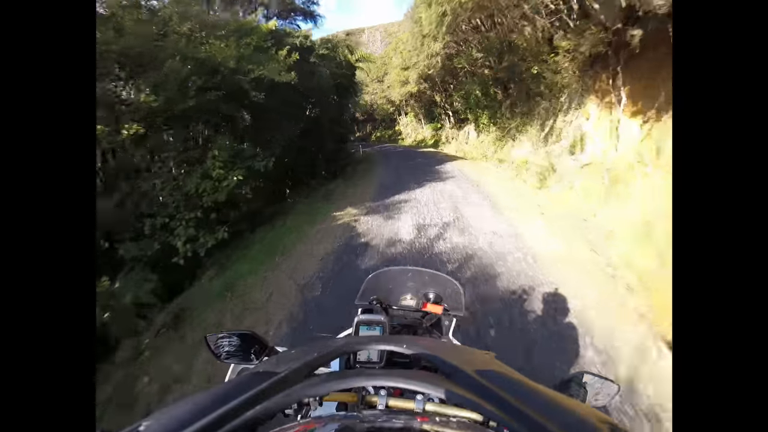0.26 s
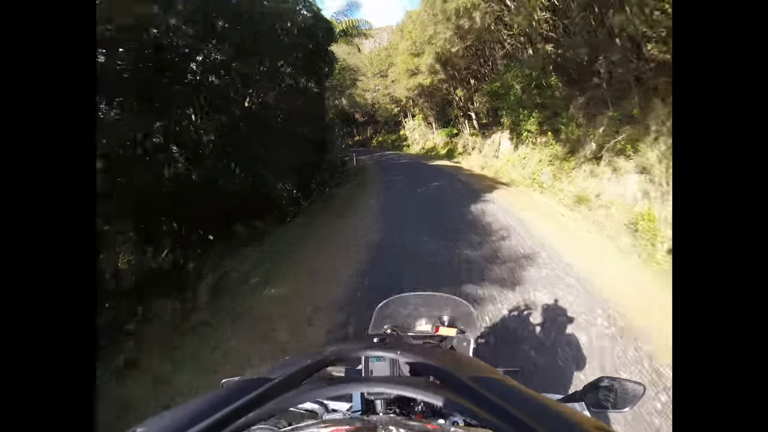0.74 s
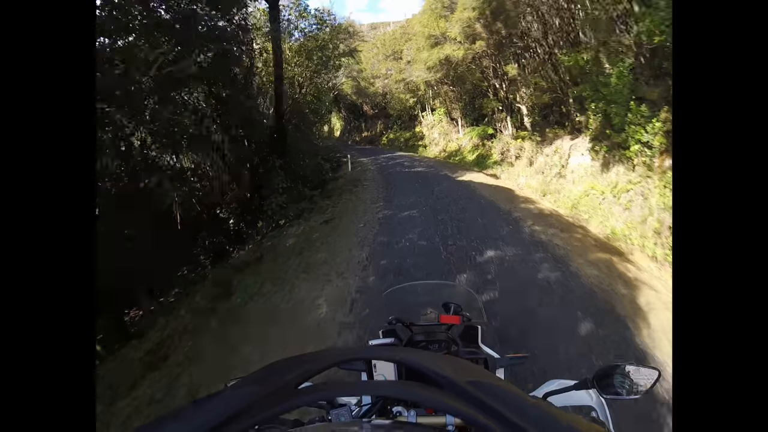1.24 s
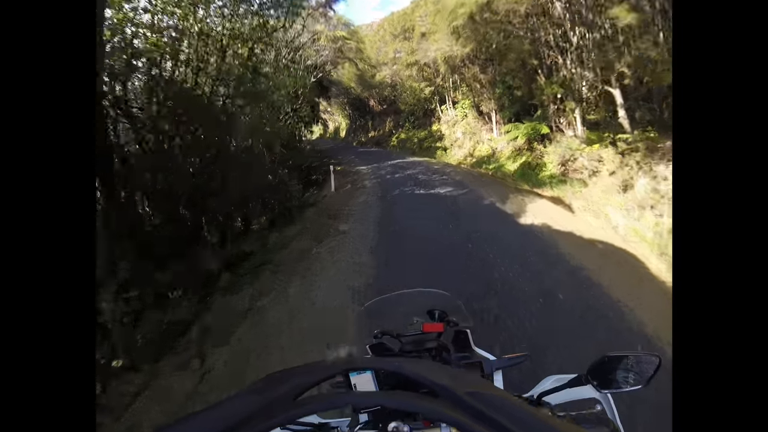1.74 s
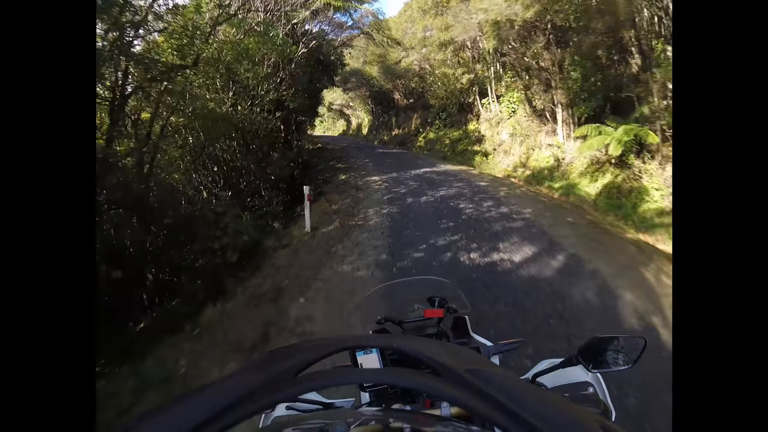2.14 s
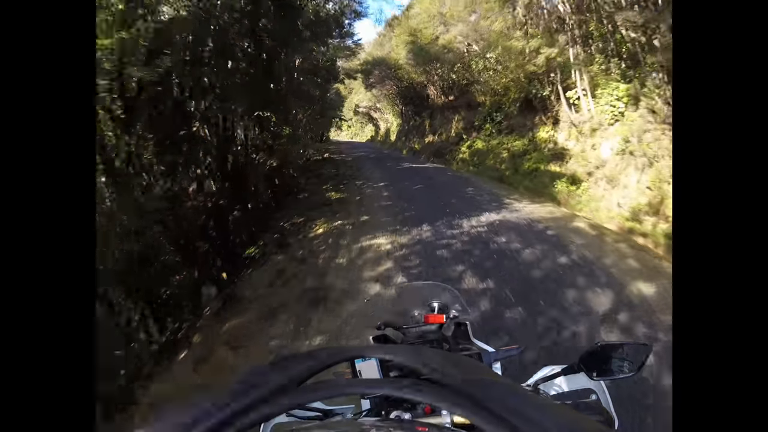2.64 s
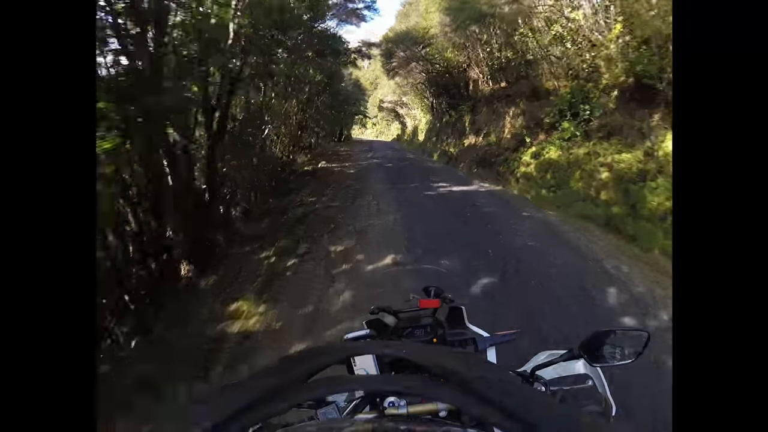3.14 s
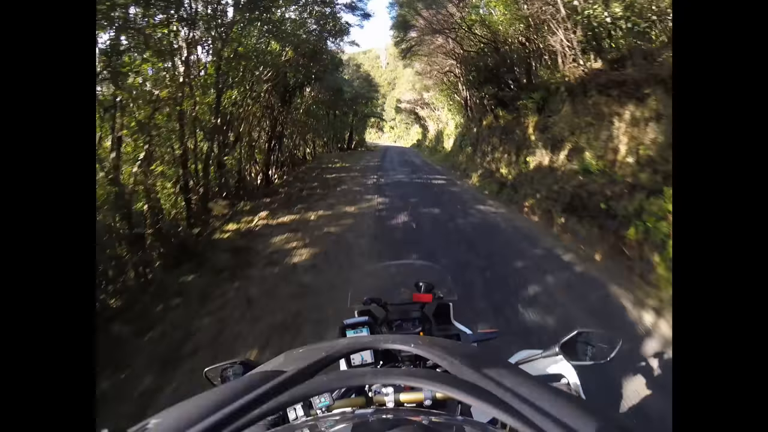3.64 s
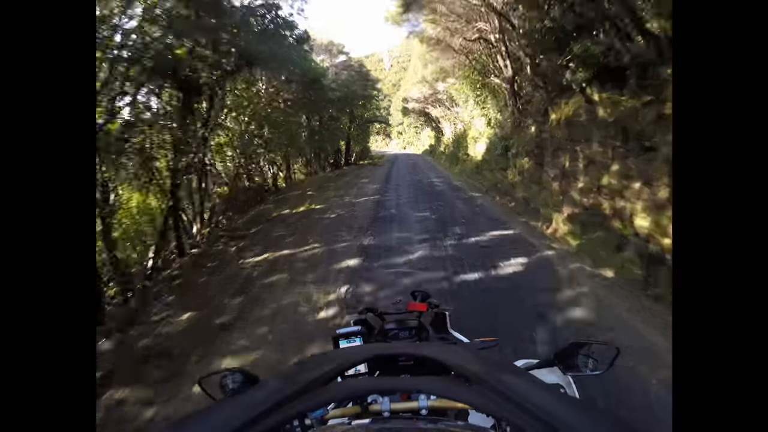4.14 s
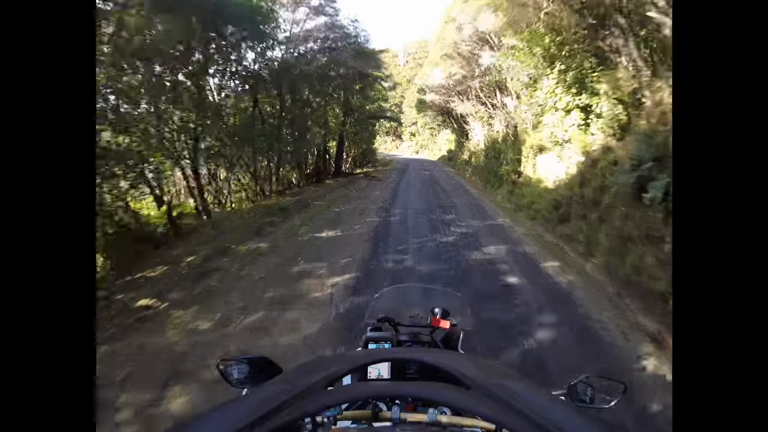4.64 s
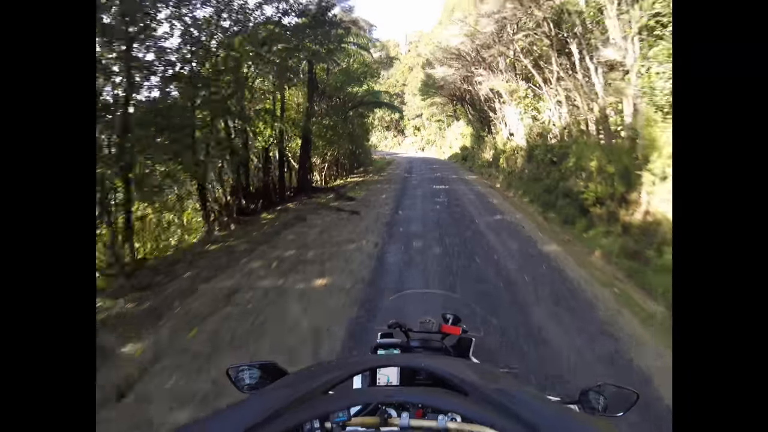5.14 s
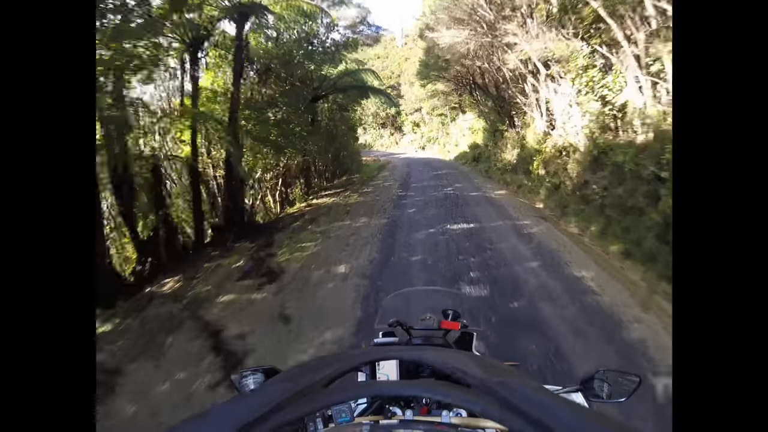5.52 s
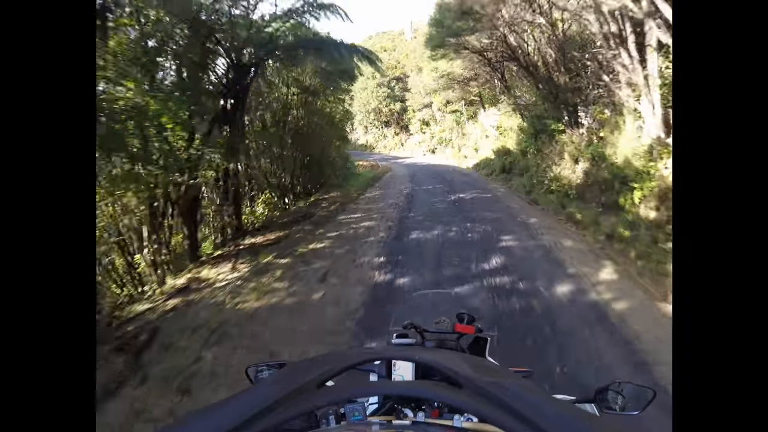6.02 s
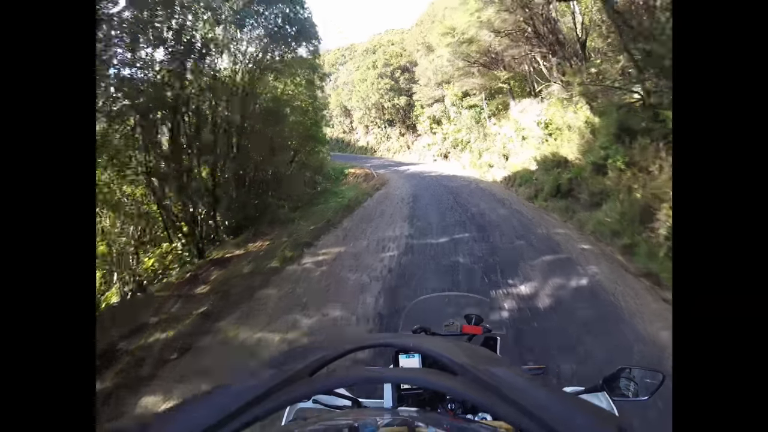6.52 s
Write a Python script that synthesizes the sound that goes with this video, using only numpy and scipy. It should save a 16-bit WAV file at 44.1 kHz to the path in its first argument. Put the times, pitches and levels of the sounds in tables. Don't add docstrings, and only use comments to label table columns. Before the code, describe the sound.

Outdoors on a gravel road, heard through a boxed, slightly compressed helmet microphone. From 0 to 0.3 s a throaty twin pulls hard, with a hollow nasal intake honk. By 0.5 s the throttle shuts and pitch drops; a stone knocks at 0.75 s. A short pull comes at 1.0-1.3 s, a cut at 1.35 s with a strong wind gust near 1.6 s, then another pull to 2.2 s and a brief dip at 2.4 s. From 2.5 s it accelerates, honk loudest around 3.2-3.7 s, pitch climbing to its peak near 4.4 s while tyre roar and bright hiss swell. Hard knocks land at 3.9 and 4.2 s. From 4.7 s the throttle is closed: the honk vanishes, grit ticks in a cluster until 5.15 s, and the low engine hum slides steadily down as road noise fades. Deep wind rumble continues, with a gust at 6.5 s, ending abruptly at about 6.8 s.

```python
import sys
import numpy as np
from scipy import signal
from scipy.fft import rfft, irfft
from scipy.io import wavfile
from scipy.ndimage import uniform_filter1d

SR = 44100
rng = np.random.default_rng(int(sys.argv[2]) if len(sys.argv) > 2 else 0)


def decibels_to_gain(level_db):
    exponent = np.asarray(level_db, float) / 20
    return 10 ** exponent


def waveform_to_disk(signal):
    frames = np.transpose(np.atleast_2d(signal))
    scaled = np.clip(frames, -1, 1) * 32767
    samples = np.round(scaled).astype(np.int16)
    wavfile.write(sys.argv[1], SR, samples)


N = 298557

SECOND_FIRING = 0.375


def in_time(rows):
    times, *columns = np.transpose(rows)
    return [np.interp(np.arange(N) / SR, times, column) for column in columns]


def rms_one(x):
    return x / np.sqrt(np.mean(x ** 2) + 1e-20)


def drift(rate):
    coarse = 40
    r = np.exp(-2 * coarse * np.pi * rate / SR)
    noise = rng.standard_normal(N // coarse + 2002)
    slow = signal.lfilter([1], [1, -2 * r, r * r], noise)[2000:]
    return np.interp(np.arange(N) / coarse, np.arange(len(slow)), rms_one(slow))


def resonance(x, hz, width):
    r = np.exp(-np.pi * width / SR)
    top_gain_one = np.array([1, 0, -1]) * (1 - r * r) / 2
    return signal.lfilter(top_gain_one, [1, -2 * r * np.cos(2 * np.pi * hz / SR), r * r], x)


def coloured(spectrum, patchy_db, rate):
    hz = np.arange(N // 2 + 1) * SR / N + 1e-3
    at, level_db = np.transpose(spectrum)
    gain = decibels_to_gain(np.interp(np.log(hz), np.log(at), level_db, -120, -120))
    shaped = rfft(rng.standard_normal(N)) * gain
    together = drift(rate / 4)
    out = 0
    for centre in at[0] * 2. ** np.arange(7):
        part = np.clip(1 - np.abs(np.log2(hz / centre)), 0, 1)
        flicker = decibels_to_gain(patchy_db * (0.5 * together + drift(rate)))
        out = out + irfft(shaped * part, N) * flicker
    return rms_one(out)


def firings(cycle, gap, rough_db, jitter):
    out = np.zeros(N)
    for offset in (0, gap):
        at = np.flatnonzero(np.diff(np.floor(cycle - offset)))
        chance = rng.standard_normal((400, 2))[:len(at)]
        moved = at + (jitter * SR * chance[:, 0]).astype(int)
        out[np.clip(moved, 0, N - 1)] = decibels_to_gain(rough_db * chance[:, 1])
    return out


def throb(cycle, depth):
    clicks = firings(cycle, SECOND_FIRING, rough_db=2.8, jitter=0.00045)
    swell = signal.lfilter([1], [1, -np.exp(-1 / (0.0057 * SR))], clicks)
    return rms_one(1 + depth * uniform_filter1d(swell, size=60))


def follows(law, pace, throttle):
    base_db, pace_db, open_db = law
    return base_db + pace_db * pace + open_db * throttle


def pipe(order_hz, throttle):
    # (frequency [Hz], width [Hz], lift with throttle shut [dB], lift with throttle open [dB])
    pipe_modes = [(131.6, 9, 3.5, 4.5), (168.4, 9, -2.5, 5)]
    lift_db = 0
    for hz, width, shut_db, open_db in pipe_modes:
        nearness = np.exp(-((order_hz - hz) / width) ** 2)
        lift_db = lift_db + (shut_db + (open_db - shut_db) * throttle) * nearness
    return lift_db


def orders(speed, throttle):
    # (order [multiple], shut [dB], pulling at low revs [dB], pulling at high revs [dB],
    #  throttle at which it is full [0-1])
    leading_orders = [(1, -22, -22.5, -15, 0.88), (2, -19, -19.5, -18, 0.99), (3, -12, -28.5, -22, 0.22),
                      (5, -28, -20, -18, .3), (6, -34, -21.5, -20.5, .22), (8, -35.5, -26, -20.5, 0.57),
                      (9, -36.5, -33.5, -22.5, .75), (11, -38, -28, -28, 0.98)]
    high = np.clip((speed - 27.3) / 0.65, 0, 1)
    levels = {}
    for k, shut_db, low_db, high_db, full in leading_orders:
        pulling_db = low_db + (high_db - low_db) * high
        pull = np.minimum(throttle / full, 1)
        order_db = shut_db + (pulling_db - shut_db) * pull
        levels[round(k)] = order_db + pipe(round(k) * speed, throttle)
    return levels


def exhaust(speed, cycle, throttle):
    # (order [multiple], leading order [multiple], share of its level [ratio], offset [dB])
    followers = [(4, 3, 0.5, -19), (7, 6, 3.5, -23.5), (10, 8, 1.8, -11)]
    silencer_hz, silencer_db_per_hz = 308, -0.2363
    leads = orders(speed, throttle)
    levels = dict(leads)
    for k, lead, share, step_db in followers:
        levels[k] = share * leads[lead] + step_db
    out = 0
    for k, level_db in levels.items():
        pair = np.angle(1 + 0.9 * np.exp(-2j * np.pi * k * SECOND_FIRING))
        swallowed_db = silencer_db_per_hz * np.maximum(k * speed - silencer_hz, 0)
        waver = decibels_to_gain(level_db + swallowed_db + 0.8 * drift(9))
        phase = 2 * np.pi * k * cycle + pair + np.pi / 2 + 0.1 * drift(6)
        out = out + np.sqrt(2) * waver * np.cos(phase)
    return out


def airbox(cycle, speed, throttle):
    # (frequency [Hz], width [Hz], level [dB])
    box_modes = [(422, 35, 8), (507, 52, -0.5), (527.5, 34, -0.5), (575, 61, 3.5)]
    # (frequency [Hz], width [Hz], level [dB])
    duct_hz, duct_width, duct_db = (468, 34, 4.3)
    # (low edge [Hz], high edge [Hz])
    edges_hz = [376, 645]
    shut_db, open_db, knee = -45.5, -15.5, 1.11
    rush = np.clip((speed - 27.6) / 0.8, 0, 1) * np.clip(3 * throttle - 1.7, 0, 1)
    gulps = firings(cycle, SECOND_FIRING - 0.012 * rush, rough_db=1.2, jitter=0.00008)
    rings = []
    for k, (hz, width, db) in enumerate(box_modes):
        sign = (-1) ** k
        rings.append(sign * decibels_to_gain(db) * resonance(gulps, hz, width))
    rings[0] = decibels_to_gain(-11 * rush) * rings[0]
    duct = rush * decibels_to_gain(duct_db) * resonance(gulps, duct_hz, duct_width)
    steep = signal.butter(4, edges_hz, "band", fs=SR, output="sos")
    honk = rms_one(signal.sosfilt(steep, duct + sum(rings)))
    honk_db = shut_db + (open_db - shut_db) * throttle ** knee
    return decibels_to_gain(honk_db - 2.0) * honk


def gusts():
    # (time [s], level [dB], half length [s])
    gust_list = [
        (.1, 1, .2),
        (1.003, 3.5, .1),
        (1.588, 5.5, 0.077),
        (2.403, 1.5, 0.086),
        (2.8, 1.5, 0.074),
        (3.396, 1.5, .13),
        (4.1, 2, 0.35),
        (4.8, -3.5, 0.34),
        (6.501, 2.5, 0.15),
    ]
    t = np.arange(N) / SR
    return sum(db * np.exp(-((t - s) / half) ** 2) for s, db, half in gust_list)


def wind_rumble(pace, throttle, gust_db):
    # (frequency [Hz], level [dB per Hz])
    rumble = [(6, -12), (15, -3), (28, -5), (50, -3), (100, -5), (160, -13), (250, -15.5), (340, -22.5),
              (520, -16), (650, -17.5), (800, -29.5)]
    level_db = follows((-17, 0.5, 2.3), pace, throttle) + gust_db
    return decibels_to_gain(level_db) * coloured(rumble, patchy_db=1.0, rate=9.4)


def tyre_roar(cycle, pace, throttle, road_gust_db):
    # (frequency [Hz], level [dB per Hz])
    roar = [(600, -0.5), (750, -1), (1000, -3.5), (1300, -5.5), (2000, -8), (2700, -11.5), (3000, -15.5),
            (3700, -19), (4300, -26)]
    level_db = follows((-37, 7, 3.46), pace, throttle) + road_gust_db
    return decibels_to_gain(level_db) * throb(cycle, depth=0.4) * coloured(roar, patchy_db=0.35, rate=13)


def road_hiss(cycle, pace, throttle, road_gust_db):
    # (frequency [Hz], level [dB per Hz])
    rubbing = [(3400, -11.5), (4400, -3.5), (5300, -1), (6200, -3.5), (7500, -7), (9000, -13),
               (10500, -20.5), (12000, -29), (15500, -40.5)]
    level_db = follows((-53, 10.7, 3.05), pace, throttle) + road_gust_db
    return decibels_to_gain(level_db) * throb(cycle, depth=0.29) * coloured(rubbing, patchy_db=0.4, rate=16)


def valve_chatter(pace, throttle):
    # (frequency [Hz], level [dB per Hz])
    patter = [(8000, -9), (10500, -0.5), (12500, -3.5), (15500, -5)]
    return decibels_to_gain(follows((-72.5, 2, 12), pace, throttle)) * coloured(patter, patchy_db=2.2, rate=12)


def stones(events, spread, trim_db):
    out = np.zeros(N)
    t = np.arange(1500) / SR
    rattles = rng.standard_normal((len(events), 1500))
    for (s, peak_db, hz, t60), rattle in zip(events, rattles):
        click = np.sqrt(SR * t60 / 12) * (t == 0)
        strike = decibels_to_gain(-60 * t / t60) * (rattle + click)
        band = signal.butter(2, [hz / spread, hz * spread], "band", fs=SR, output="sos")
        hit = signal.sosfilt(band, strike)
        start = round(s * SR)
        out[start:start + len(t)] += decibels_to_gain(peak_db + trim_db) * hit / np.abs(hit).max()
    return out


def gravel():
    # (time [s], peak level [dB], frequency [Hz], time to fall 60 dB [s])
    ticks = [(.1724, -33, 5500, .008), (.179, -28, 6000, .012), (.1864, -35, 5300, .008),
             (.2984, -37, 10500, .045), (2.2084, -35, 5500, .06), (2.8504, -33, 5500, .01),
             (4.5705, -29, 5700, .014), (4.6214, -34, 7500, .008), (4.6274, -31, 6300, .012),
             (4.6354, -28, 5300, .018), (4.638, -36, 11000, .035), (4.6614, -36, 9000, .008),
             (4.6763, -33, 7000, .01), (4.6834, -35, 6500, .008), (4.7446, -29, 6000, .018),
             (4.783, -29, 5150, .018), (4.7994, -36, 7500, .008), (4.8708, -35, 5500, .01),
             (4.8774, -33, 5800, .015), (4.8974, -38, 8000, .008), (5.0204, -35, 7000, .008),
             (5.1487, -29, 5500, .014)]
    # (time [s], peak level [dB], frequency [Hz], time to fall 60 dB [s])
    knocks = [(.751, -16, 580, .022), (.865, -27, 950, .015), (.939, -26, 1750, .015),
              (.957, -22, 1300, .04), (.963, -19, 620, .04), (1.053, -27, 700, .015),
              (1.541, -25, 1100, .015), (1.676, -27, 900, .015), (2.055, -23, 800, .03),
              (2.082, -24, 950, .015), (3.21, -22, 1150, .015), (3.904, -23, 1500, .01),
              (3.91, -16, 1550, .016), (3.914, -20, 600, .02), (3.916, -21, 1400, .012),
              (4.211, -14, 900, .016), (4.753, -27, 850, .015), (5.566, -25, 1700, .015),
              (5.569, -24, 700, .015), (5.571, -21, 1750, .02), (5.598, -34, 2400, .03),
              (6.179, -29, 1000, .015)]
    return stones(ticks, spread=1.25, trim_db=6.5) + stones(knocks, spread=1.42, trim_db=4.5)


def scene():
    # (time [s], speed [cycles per s])
    revs = [(0, 28.65), (.27, 28.85), (.52, 25.9), (.88, 25.75), (1.02, 27.1), (1.4, 26.1), (1.75, 25.75),
            (2.12, 26.35), (2.5, 26.33), (3.1, 27.75), (3.37, 30.1), (3.56, 29.7), (4.05, 32.45),
            (4.42, 33.0), (4.6, 32.25), (4.82, 30.75), (6.3, 24.1), (6.77, 23.0)]
    # (time [s], throttle [0-1])
    wrist = [(0, 0.94), (.29, 0.91), (.45, 0.05), (.92, 0.03), (1.02, 0.52), (1.27, 0.64), (1.35, 0.01),
             (1.54, 0.1), (1.68, 0.66), (2.18, 0.9), (2.36, 0.42), (2.52, 0.74), (3.2, 1), (3.68, 0.89),
             (3.82, .65), (4.25, 0.5), (4.62, 0.23), (4.73, 0.02)]
    # (time [s], share of top speed [0-1])
    road_speed = [(0, 0.47), (.8, 0.34), (1.6, 0.4), (2.4, 0.41), (3.3, 0.8), (4.2, 0.97), (4.7, 0.79),
                  (5.6, 0.48), (6.77, 0.07)]
    speed, pace = in_time(revs)[0], in_time(road_speed)[0]
    throttle = np.clip(in_time(wrist)[0], 0, 1)
    cycle = np.cumsum(speed) / SR
    engine = exhaust(speed, cycle, throttle) + airbox(cycle, speed, throttle)
    gust_db = gusts()
    road_gust_db = 0.34 * gust_db
    wind = wind_rumble(pace, throttle, gust_db)
    tyres = tyre_roar(cycle, pace, throttle, road_gust_db)
    hiss = road_hiss(cycle, pace, throttle, road_gust_db)
    valves = valve_chatter(pace, throttle)
    return (engine + wind + tyres + hiss + valves + gravel())[None]


def band_limit(x):
    return signal.sosfilt(signal.butter(12, 15676, fs=SR, output="sos"), x)


def record(dry):
    power = uniform_filter1d(dry ** 2, round(0.027 * SR), axis=1)
    held = dry * (power / decibels_to_gain(-24.5) + 1e-6) ** -0.12
    rounded = held / (1 + np.abs(held) ** 4) ** 0.25
    housing = signal.butter(2, 8180, fs=SR, output="sos")
    dulled = signal.sosfilt(housing, rounded)
    ending = np.minimum(np.arange(N)[::-1] / (0.006 * SR), 1)
    return band_limit(dulled * ending)


dry = scene()
out = record(dry)
waveform_to_disk(out)
```